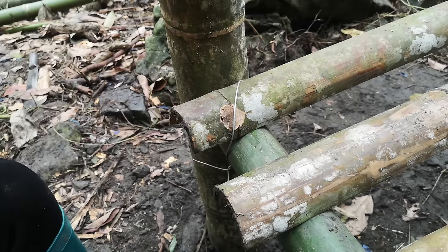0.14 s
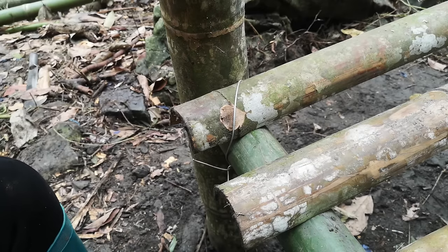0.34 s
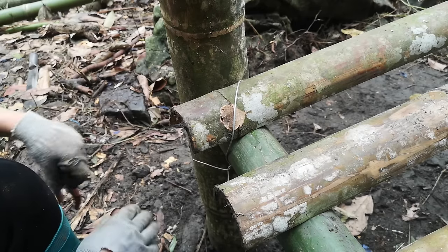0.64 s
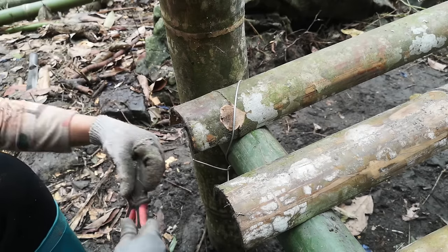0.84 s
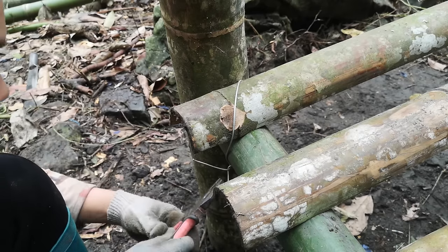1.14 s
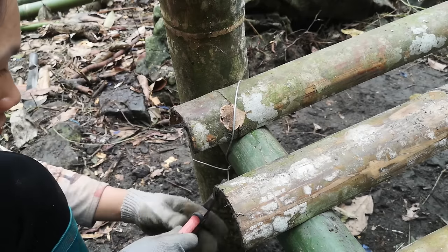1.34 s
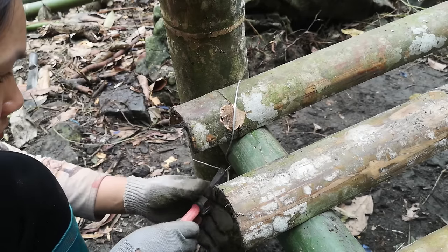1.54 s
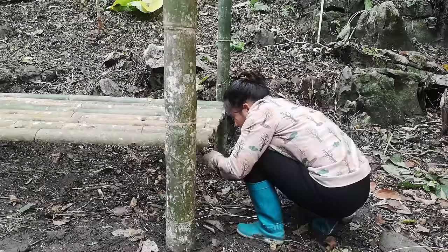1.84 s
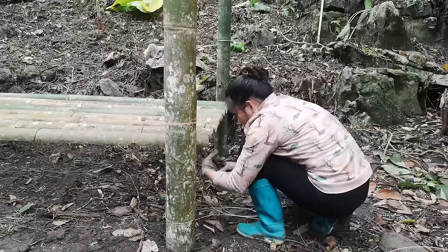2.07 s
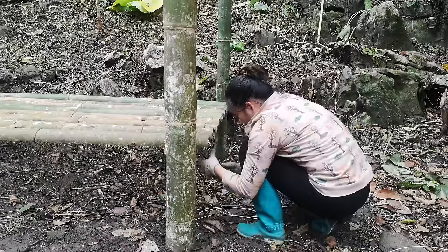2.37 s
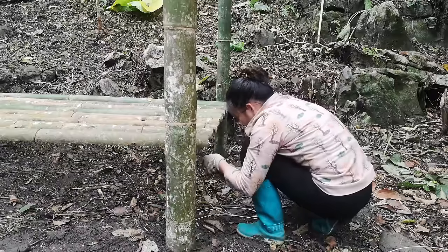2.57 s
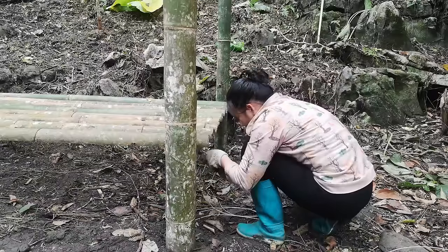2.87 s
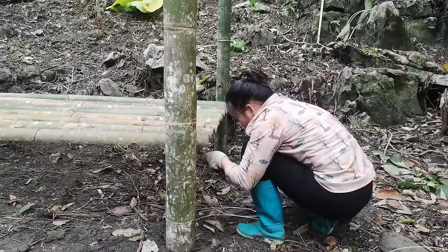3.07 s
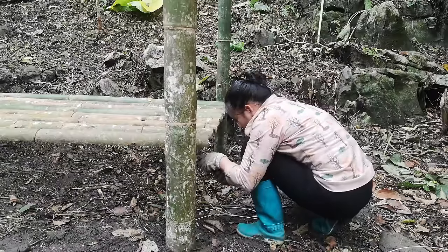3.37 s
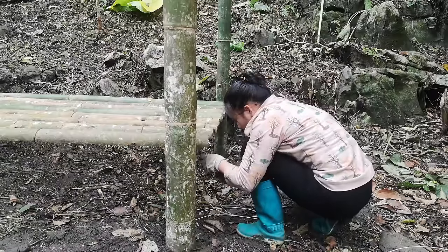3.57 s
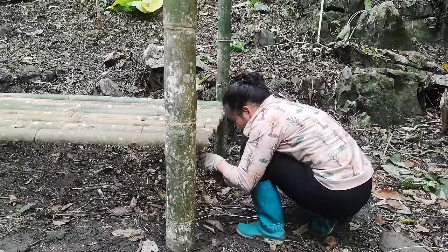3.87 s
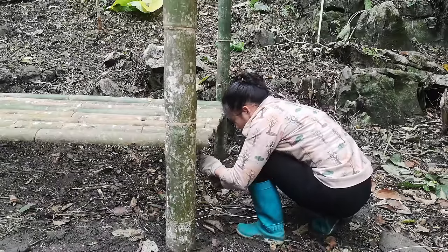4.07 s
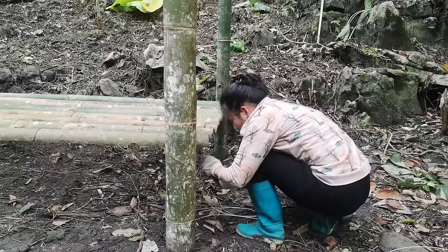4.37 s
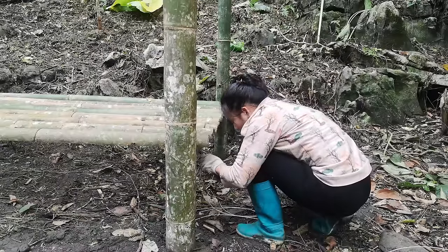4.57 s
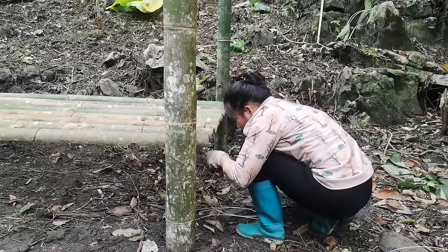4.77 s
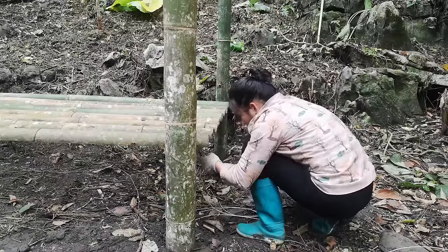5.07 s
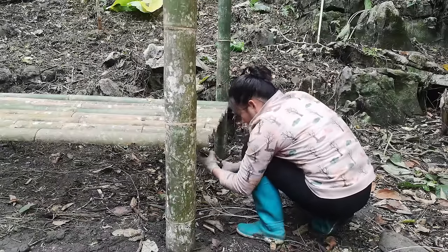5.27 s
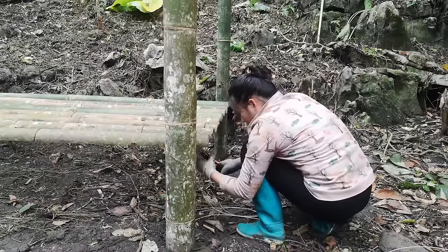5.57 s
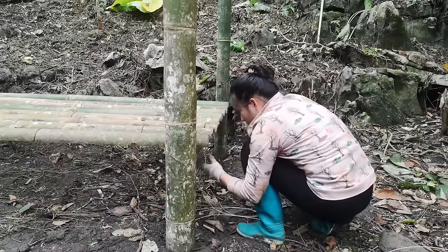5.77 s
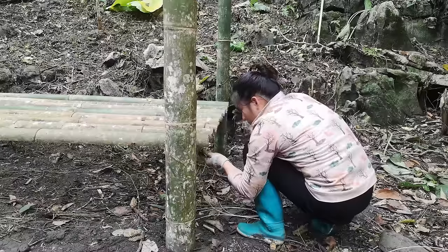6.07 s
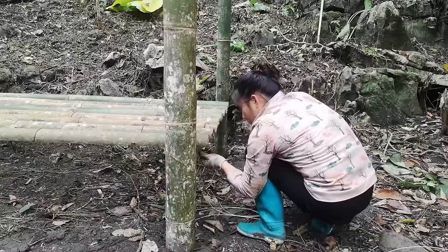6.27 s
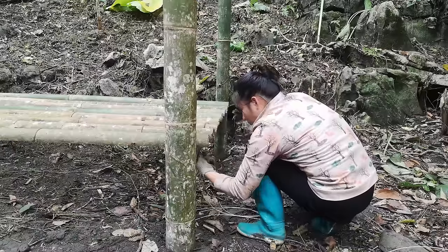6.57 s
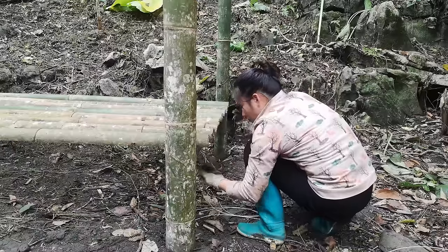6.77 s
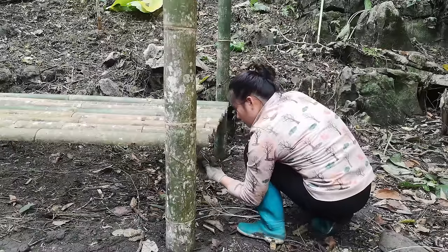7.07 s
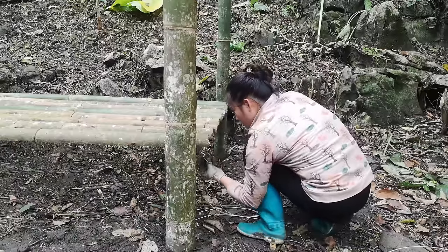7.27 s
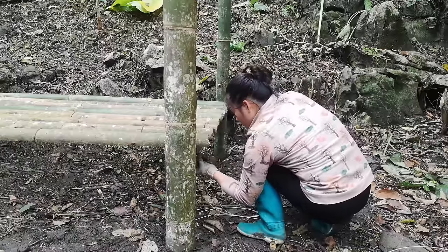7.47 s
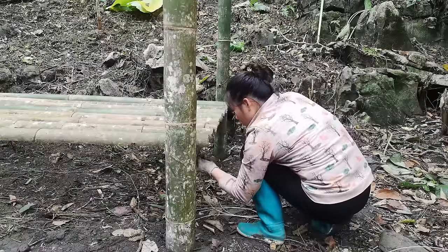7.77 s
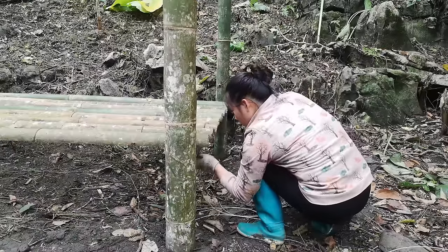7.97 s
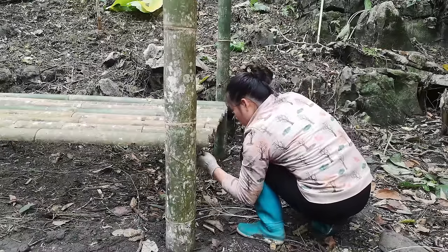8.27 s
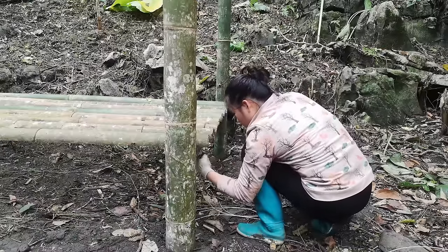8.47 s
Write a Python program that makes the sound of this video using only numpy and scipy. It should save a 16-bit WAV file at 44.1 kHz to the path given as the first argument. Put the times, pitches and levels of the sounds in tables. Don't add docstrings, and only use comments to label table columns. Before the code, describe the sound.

Outdoor forest, phone-like stereo pickup, work to the left. Soft glove friction and light plier ticks lead to a sharp metallic-woody clack and a duller rap. A brief gap, then bamboo slams, snaps and rattles in quick succession while wire scrapes bark. It calms, cracks loudly again in the middle, peaks with one heavy dry jolt, and ends in sparse faint taps over steady insects and leaves.

```python
import sys
import numpy as np
from scipy import signal
from scipy.fft import rfft, irfft, next_fast_len
from scipy.io import wavfile
from scipy.ndimage import uniform_filter1d

SR = 44100
rng = np.random.default_rng(int(sys.argv[2]) if len(sys.argv) > 2 else 0)


def wav_record(signal):
    frames = np.transpose(np.atleast_2d(signal))
    bounded = np.clip(frames, -1, 1)
    quanta = np.round(bounded * 32767).astype(np.int16)
    wavfile.write(sys.argv[1], SR, quanta)


def volts(x):
    e = np.asarray(x, float) / 20
    return 10 ** e


N = 380583
T = np.arange(N) / SR
COARSE = T[::64]
LEAD = 2400


def unit(x):
    return x / np.sqrt(np.mean(x ** 2))


def colour(x, points):
    hz, db = np.transpose(points)
    size = next_fast_len(x.shape[-1])
    f = np.maximum(np.arange(size // 2 + 1) * SR / size, 1)
    gain = volts(np.interp(np.log(f), np.log(hz), db))
    return irfft(rfft(x, size) * gain, size)[..., :x.shape[-1]]


def band(x, lo_hz, hi_hz, order=2):
    sos = signal.butter(order, [lo_hz, min(hi_hz, SR / 2 - 1)], "band", fs=SR, output="sos")
    return signal.sosfilt(sos, x)


def walk(rate):
    k = int(SR / rate)
    steps = np.repeat(rng.standard_normal(N // k + 1), k)
    return unit(uniform_filter1d(uniform_filter1d(steps, k), k)[:N])


def swell(s, db, rise, fall):
    distance = np.where(COARSE < s, (s - COARSE) / rise, (COARSE - s) / fall)
    return volts(db - 20 * distance)


# freq_hz [Hz], level_db [dB per Hz]
FOREST_COLOUR = [(59, -32), (100, -7), (149, -7.5), (579, -15.5), (1290, -13), (6050, -18.5), (8670, -26),
                 (15700, -26.5)]


def forest():
    hiss = colour(rng.standard_normal((2, N)), [(60, -30)] + FOREST_COLOUR)
    return unit(hiss) * volts(-65.5 + 0.5 * walk(1.5))


# peak_s [s], level_db [dB], half_length_s [s]
GUSTS = [
    (0.0, -69.5, 0.58),
    (0.98, -52.5, 0.073),
    (1.539, -57.5, 0.33),
    (1.854, -58, 0.055),
    (2.196, -48, 0.093),
    (2.9, -63.5, 1),
    (4.54, -67, 0.26),
    (5.33, -54, 0.17),
    (5.742, -54.5, .07),
    (6.48, -64.5, 0.57),
]


def wind():
    breeze_db = -65
    blow = volts(breeze_db) + sum(swell(s, db, half_s, half_s) for s, db, half_s in GUSTS)
    rumble = [(8, -14.0), (20, 1.5), (35, -4.5), (60, -3.5), (110, -13.0), (200, -21.0), (400, -51)]
    mid, side = colour(rng.standard_normal((2, N)), rumble)
    gust = np.interp(T, COARSE, blow) * volts(1.16 * walk(27))
    return gust * (mid + 0.11 * side * np.array([[1], [-1]])) / np.std(mid)


# centre_hz [Hz], width_hz [Hz], level_db [dB], left_minus_right_db [dB]
CHORUSES = [(7290, 780, -71.5, 16.5), (2270, 1044, -69, 4)]
# time_s [s], high_chorus_db [dB], low_chorus_db [dB]
DRONE = [(0.0, -62.5, -61), (1.54, -62.5, -62), (2.48, -61.5, -64), (8.63, -61, -63.5)]


def insects():
    s, *curves = np.transpose(DRONE)
    out = 0
    for (hz, width_hz, db, pan_db), curve in zip(CHORUSES, curves):
        clicks = rng.standard_normal((2, N)) * volts(0.9 * walk(12) + 1.2 * walk(120))
        song = unit(band(clicks, hz - width_hz / 2, hz + width_hz / 2))
        drift_db = np.interp(T, s, curve - np.mean(curve))
        out = out + song * volts(db + drift_db + np.array([[pan_db], [-pan_db]]) / 2)
    return out


def trees(x, t60=0.25, wet_db=-15):
    t = np.arange(SR // 2) / SR
    decay = np.exp(-np.log(1000) * t / t60) * np.clip(t / 0.0046, 0, 1)
    tail = rng.standard_normal((2, len(t))) * decay
    tail = colour(tail, [(100, -6), (1000, -7), (8000, -10), (15000, -1.5)])
    tail = tail / np.sqrt(np.sum(tail ** 2, axis=1, keepdims=True))
    tail = tail * volts(wet_db + np.array([[1.5], [-1.5]]))
    return signal.fftconvolve(x[None], tail, axes=1)[:, :N]


def to_ears(x, shade_db, lag):
    shade = [(150, 2.0), (300, -0.15 * shade_db), (600, -1.1 * shade_db), (1500, -0.75 * shade_db),
             (5000, -1.3 * shade_db), (9000, -shade_db), (13000, -1.2)]
    right = colour(x, shade)
    bounce = band(rng.standard_normal(400) * np.exp(-np.arange(400) / 110), 310, 14600)
    right = 0.7 * np.roll(right, lag) + volts(-21.5) * signal.fftconvolve(right, bounce)[:N]
    return np.array([x, right]) * 1.236


# peak_s [s], half_length_s [s], pitch_hz [Hz], level_db [dB]
SQUEAKS = [
    (0.083, 0.042, 2500, -61),
    (0.95, 0.061, 2650, -60.5),
    (0.964, 0.049, 2180, -61),
]


def squeak():
    out = 0
    for s, half_s, hz, db in SQUEAKS:
        envelope = np.clip(1 - abs(T - s) / half_s, 0, 1)
        out = out + volts(db + 7.5 * walk(81.0)) * envelope * np.sin(2 * np.pi * hz * T)
    return out


# peak_s [s], level_db [dB], rise_s [s], fall_s [s], brightness_db [dB]
STROKES = [(0.106, -62, 0.083, 0.052, -19), (0.33, -63, .12, .2, 3), (0.435, -51, 0.047, .22, -3),
           (0.57, -50, .2, .07, -0.5), (1.0, -67.5, 0.43, 0.26, -6), (1.26, -52, 0.038, .09, -9),
           (2.185, -42, .02, .15, -5), (2.55, -61.5, 0.36, 0.24, -22.5), (2.77, -47, 0.022, 0.098, -25),
           (2.89, -50, .1, 0.1, -26), (3.25, -65, .3, 0.54, -18), (3.69, -62, .05, .09, -25),
           (4.52, -53, .02, 0.12, -16), (5.285, -40, .02, 0.061, -8.5), (5.4, -50.5, 0.08, .02, -9.5),
           (5.768, -51.5, 0.25, .06, -29)]
# freq_hz [Hz], level_db [dB per Hz]
GLOVE_RUB = [(900, -10), (1800, -8), (2600, 2.5), (3500, 3), (4800, -5.5), (6500, -1.5), (9000, -29)]
# freq_hz [Hz], level_db [dB per Hz]
WIRE_DRAG = [(500, -0.5), (1000, -5.5), (1600, 2.5), (2500, 3.5), (3500, -12), (5800, -4), (9000, -35)]


def rustle():
    level = bright = 0
    for s, db, rise, fall, brightness_db in STROKES:
        stroke = swell(s, db, rise, fall)
        level = level + stroke
        bright = bright + volts(brightness_db) * stroke
    level = uniform_filter1d(np.interp(T, COARSE, level), size=600)
    bright = uniform_filter1d(np.interp(T, COARSE, bright), size=600)
    grains = rng.standard_normal(N) * volts(1.64 * rng.exponential(size=N) + 2.5 * walk(60))
    rub, drag = (unit(colour(grains, [(200, -47.5)] + body + [(12000, -57)])) for body in (GLOVE_RUB, WIRE_DRAG))
    hiss = unit(colour(grains, [(6000, -38.0), (7200, 2.5), (8300, 3), (10000, -9), (15500, -14)]))
    return level * np.where(T < SCENE_CHANGE[2][0], rub, drag) + bright * hiss + squeak()


def ring(modes, chance, scatter_db=4, size=9000):
    hz, db, t60 = np.transpose(modes)[:, :, None]
    t = np.arange(size) / SR
    pitch, strength, sign = chance[:, :len(hz), None]
    hz = hz * (1 + 0.0027 * scatter_db * pitch)
    gain = volts(db + scatter_db * strength) * np.sign(sign)
    onset = np.minimum(t * hz / 2.09, 1)
    decay = np.exp(-np.log(1000) * t / t60)
    return np.sum(gain * onset * np.sin(2 * np.pi * hz * t) * decay, axis=0)


def dense(points, t60, focus_hz, focus_db, count=80, size=2600):
    chance = rng.standard_normal((3, count, 1))
    hz = np.geomspace(350, 15000, count)[:, None] * (1 + 0.02 * chance[0])
    t60 = t60 * (1000 / hz) ** 0.796
    point_hz, point_db = np.transpose(points)
    db = np.interp(np.log(hz), np.log(point_hz), point_db) + 2.1 * chance[1]
    db = db + focus_db * np.exp(-(np.log(hz / focus_hz) / 0.16) ** 2)
    gain = volts(db) * np.sqrt(hz / t60) * np.sign(chance[2])
    t, hz, t60, gain = (np.float32(v) for v in (np.arange(size) / SR, hz, t60, gain))
    onset = np.minimum(t * hz / 1.48, 1) ** 2
    decay = np.exp(-t / t60 * float(np.log(1000)))
    return np.sum(gain * onset * np.sin(2 * np.pi * hz * t) * decay, axis=0)


# freq_hz [Hz], level_db [dB], t60_s [s]
TUBE_MODES = [(194.8, -5.5, 0.23), (222, -5.5, 0.28), (264.7, -6.5, 0.15), (334, -15, 0.1),
              (388.5, -3.5, 0.17), (479.5, -7.5, 0.14), (561.7, -8, 0.1)]


def tube_boom(chance, scatter_db):
    return ring(TUBE_MODES, chance, scatter_db)


# freq_hz [Hz], level_db [dB], t60_s [s]
WALL_MODES = [(985, 7.5, 0.057), (1430, -8.5, 0.042), (1555, -2, 0.11), (1730, -8, 0.062),
              (2160, -4, 0.025), (2660, -1, 0.1)]


def wall_ring(chance):
    return ring(WALL_MODES, chance, size=4000)


# freq_hz [Hz], level_db [dB per Hz]
STEEL_COLOUR = [(400, -55.5), (3500, -9), (4800, 0), (5800, 0), (7500, -6), (10000, -16.5), (15000, -28.5)]


def steel_tick(s, t60):
    return dense(STEEL_COLOUR, t60, 4600 if s < SCENE_CHANGE[2][0] else 5830, focus_db=10)


def add(out, s, db, lead_db, rattle_s, bodies, bounce_db):
    t = (np.arange(3 * LEAD) - LEAD) / SR
    grit = rng.standard_normal((2, len(t)))
    shape = np.where(t < 0, volts(lead_db) * np.exp(t / 0.01), np.exp(-t / rattle_s))
    push = shape * grit[0] * volts(5.43 * grit[1] + bounce_db)
    push[LEAD] = 1
    i = int(s * SR)
    for body, part_db in bodies:
        y = signal.fftconvolve(push, body)
        out[i:i + len(y)] += volts(db + part_db) * y / np.abs(y).max()


# start_s [s], peak_db [dB], wall_pitch_hz [Hz], tube_db [dB], steel_db [dB]
KNOCKS = [(2.117, -41, 1900, -4, -15), (2.359, -39.5, 1530, -12, -33), (2.508, -42.5, 2720, -13.5, -18),
          (2.53, -33.5, 2640, -28, -18), (2.753, -33.5, 2700, -13, -11), (2.836, -33.5, 2720, -31, -11),
          (2.916, -40.5, 970, -6, -21), (2.965, -41.5, 1980, -2.5, -28), (3.191, -44.5, 2050, -9, -19),
          (3.55, -51.5, 1880, -12, -13), (3.689, -41, 990, -9, -26), (4.427, -29, 1830, -14, -30),
          (4.447, -39.5, 1600, -10, -20), (5.455, -27, 1550, -18.5, -10), (5.744, -30.5, 2260, -21, -12),
          (6.464, -49.5, 2690, -30, -16), (7.4, -53, 2000, -22, -20)]
# start_s [s], peak_db [dB], wall_pitch_hz [Hz], tube_db [dB]
TICKS = [(0.077, -49, 2450, -23), (0.185, -50, 3800, -13), (0.415, -49.5, 3320, -23),
         (0.429, -38.5, 3250, -33), (0.544, -43, 2930, -11), (0.954, -48.5, 2940, -15),
         (2.548, -39, 2540, -16), (3.366, -45.5, 1430, -9.5), (5.675, -41, 2450, -14),
         (5.706, -41, 2340, -8.5), (5.728, -30, 2100, -18.5), (6.669, -52, 1730, -18),
         (7.1, -50.5, 2806, -21), (8.002, -41.5, 1750, -15.5)]
# freq_hz [Hz], level_db [dB per Hz]
TOUCH_COLOUR = [(400, -13), (800, -4.5), (1500, -5), (2800, -3), (4000, -17), (8000, -35), (15000, -55.5)]


def light_touches(out):
    tick_steel_db = -4.5
    for s, db, hz, tube_db, steel_db in KNOCKS + [(*tick, tick_steel_db) for tick in TICKS]:
        chance = rng.standard_normal((3, 16))
        bodies = ((dense(TOUCH_COLOUR, 0.052, hz, focus_db=10.5), -1.5),
                  (tube_boom(chance, 2.6), tube_db - 2.0),
                  (steel_tick(s, 0.068), steel_db),
                  (wall_ring(chance), -13))
        add(out, s, db, -15, 0.015, bodies, bounce_db=-19)


def hard_blows(out, blows, wall, lead_db, ring_db, split_db, rattle_s):
    for s, db, hz, tube_db, steel_db in blows:
        chance = rng.standard_normal((3, 16))
        split = band(rng.standard_normal(400) * np.exp(-np.arange(400) / 55), 3100, 9400)
        bodies = ((dense(wall + [(15000, -47)], 0.033, hz, focus_db=6.5), -3),
                  (tube_boom(chance, 3.0), tube_db + 3.0),
                  (steel_tick(s, 0.049), steel_db),
                  (split, steel_db + split_db),
                  (wall_ring(chance), ring_db))
        add(out, s, db, lead_db, rattle_s, bodies, bounce_db=-23)


# start_s [s], peak_db [dB], wall_pitch_hz [Hz], tube_db [dB], steel_db [dB]
BITE = [
    (1.232, -12.5, 1290, -41.5, -4),
]
RAP = [
    (1.5, -19, 1200, -21, -13),
]
# freq_hz [Hz], level_db [dB per Hz]
JAWS_COLOUR = [(410, -60), (750, -32), (1140, -5.5), (1570, -2.5), (1830, -8.5), (2490, -2.5), (3350, -24),
               (7200, -24)]
# freq_hz [Hz], level_db [dB per Hz]
END_COLOUR = [(180, -36), (330, -15), (850, -1.5), (1550, 3), (1850, -8), (2800, -7), (3550, -38),
              (6300, -42)]


def close_up_blows(out):
    hard_blows(out, BITE, JAWS_COLOUR, -17, ring_db=-34, split_db=-14, rattle_s=0.9 * 0.0092)
    hard_blows(out, RAP, END_COLOUR, -17, ring_db=-36, split_db=-28, rattle_s=0.8 * 0.0092)


# start_s [s], peak_db [dB], wall_pitch_hz [Hz], tube_db [dB], steel_db [dB]
SNAPS = [
    (2.672, -24, 2170, -15.5, -12.5),
    (2.730, -23, 2860, -19.5, -10),
    (5.407, -16.5, 2650, -31.5, -14),
]
LED_SNAPS = [
    (2.856, -26, 940, -10, -32),
    (4.489, -16.5, 1750, -23, -17.5),
]
# freq_hz [Hz], level_db [dB per Hz]
CRACK_COLOUR = [(240, -36), (420, -8), (750, -16), (990, 1.5), (1250, -6.5), (1550, -4.5), (3000, -6.5),
                (4000, -18)]


def snaps(out):
    hard_blows(out, SNAPS, CRACK_COLOUR, -17, ring_db=-11, split_db=-6, rattle_s=1.3 * 0.0092)
    hard_blows(out, LED_SNAPS, CRACK_COLOUR, -4, ring_db=-11, split_db=-5, rattle_s=1.1 * 0.0092)


# start_s [s], peak_db [dB], wall_pitch_hz [Hz], tube_db [dB], steel_db [dB]
JOLT = [
    (5.251, -2.5, 2250, -36, -12),
]
SLAM = [
    (2.153, -8.5, 1500, -30, -14),
]
# freq_hz [Hz], level_db [dB per Hz]
HEAVY_COLOUR = [(240, -44), (520, -10), (790, -20), (1030, -1.5), (1400, -7), (2400, -7), (3500, -18),
                (8800, -22)]


def heavy_blows(out):
    hard_blows(out, JOLT, HEAVY_COLOUR, -17, ring_db=-22, split_db=-7, rattle_s=0.45 * 0.0092)
    hard_blows(out, SLAM, HEAVY_COLOUR, -6.5, ring_db=-17, split_db=-3, rattle_s=0.9 * 0.0092)


def pliers_on_bamboo():
    out = np.zeros(N + 30000)
    light_touches(out)
    close_up_blows(out)
    snaps(out)
    heavy_blows(out)
    return out[LEAD:LEAD + N]


def scene():
    background = forest() + wind() + insects()
    work = pliers_on_bamboo()
    near = to_ears(work, shade_db=8.5, lag=26) + to_ears(rustle(), shade_db=10.5, lag=10)
    return background + near * volts(-0.33) + trees(work)


# time_s [s], gain_db [dB]
SCENE_CHANGE = [(1.735, 4), (1.745, -9), (1.755, -38), (1.761, -26), (1.768, 6)]


def scene_change(x):
    s, db = np.transpose(SCENE_CHANGE)
    return x * volts(np.interp(T, s, db))


def low_pass(x):
    return signal.sosfilt(signal.butter(12, 15830, fs=SR, output="sos"), x)


def record(dry):
    ceiling = 0.93
    sound = ceiling * np.tanh(scene_change(dry) / ceiling)
    sound = signal.sosfilt(signal.ellip(8, 0.1, 60, 15750, fs=SR, output="sos"), sound)
    return low_pass(sound)


dry = scene()
out = record(dry)
wav_record(out)
```